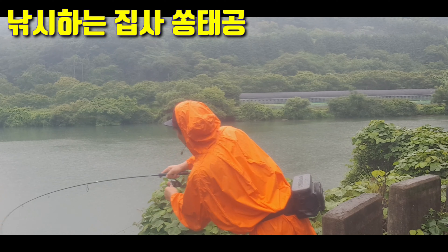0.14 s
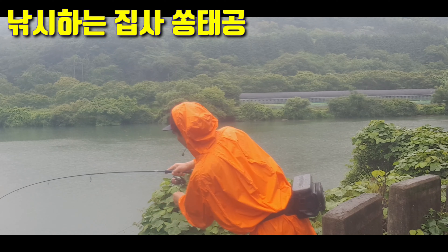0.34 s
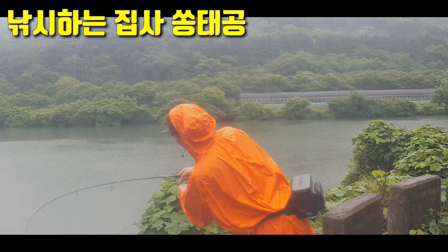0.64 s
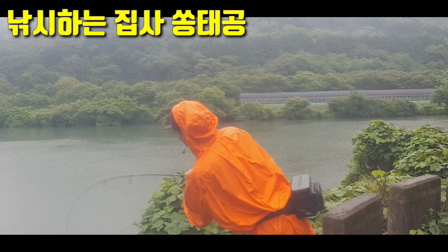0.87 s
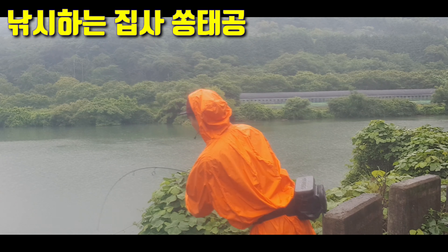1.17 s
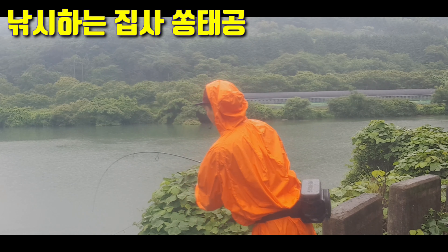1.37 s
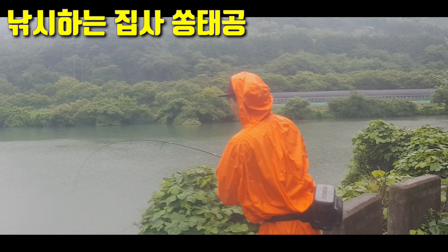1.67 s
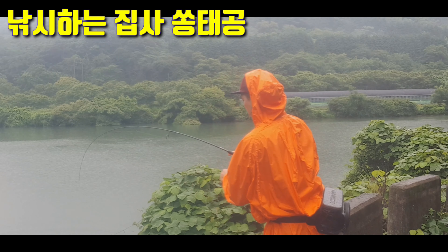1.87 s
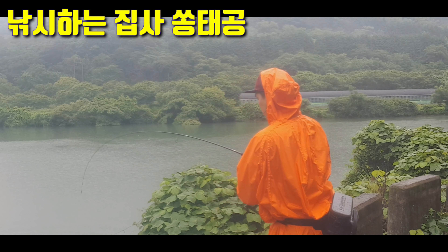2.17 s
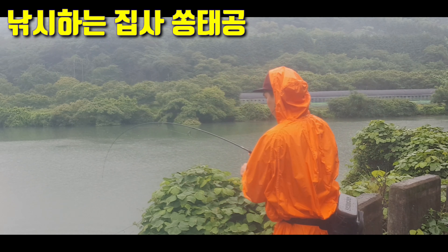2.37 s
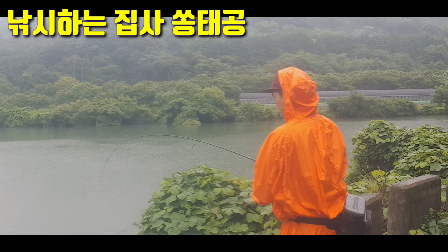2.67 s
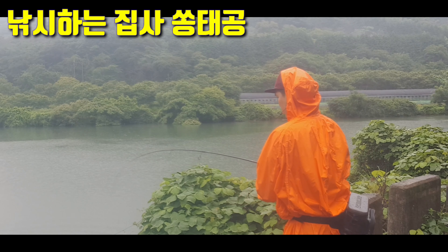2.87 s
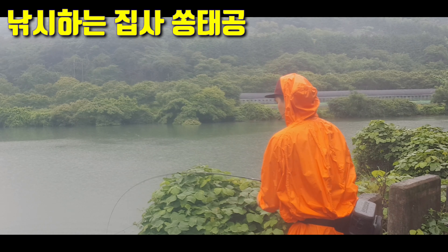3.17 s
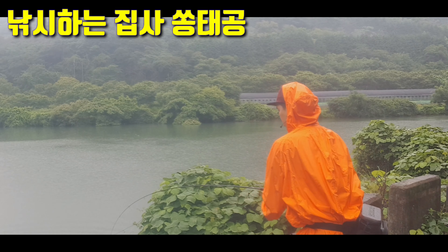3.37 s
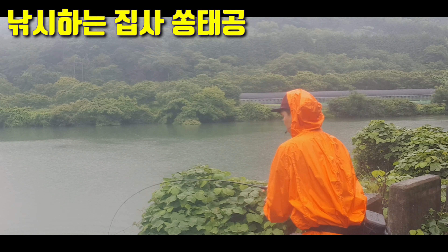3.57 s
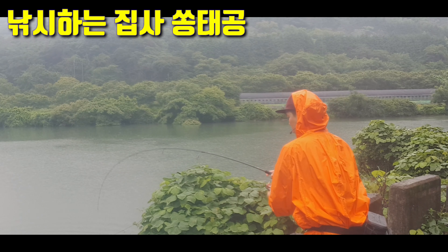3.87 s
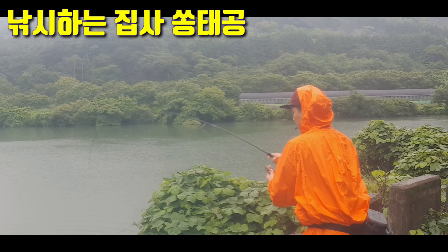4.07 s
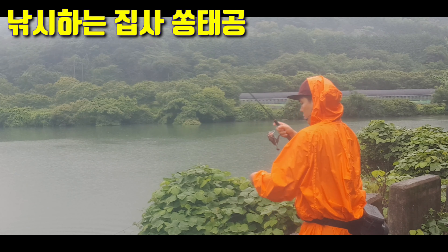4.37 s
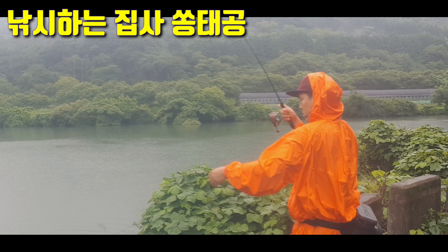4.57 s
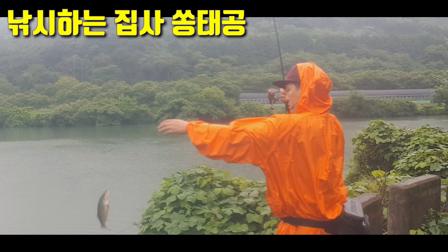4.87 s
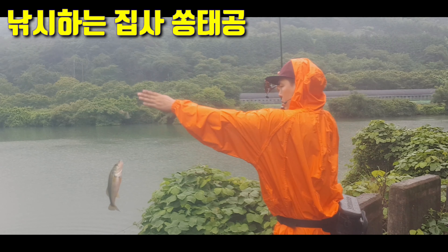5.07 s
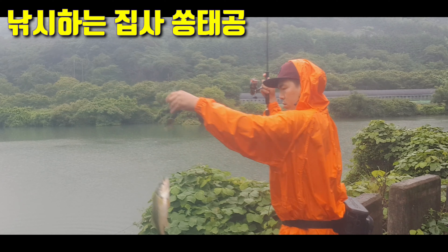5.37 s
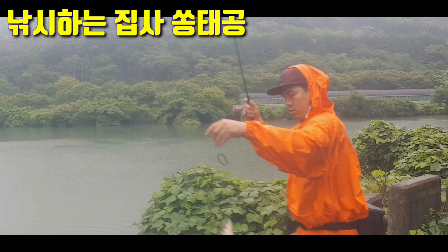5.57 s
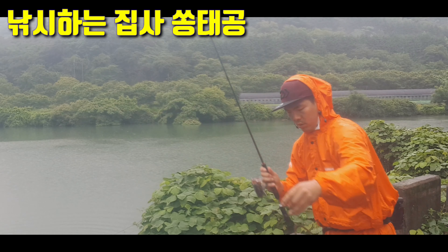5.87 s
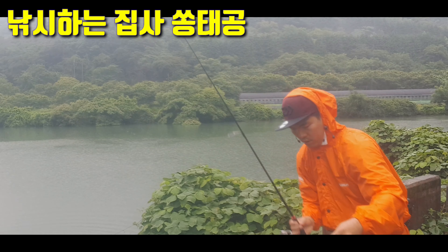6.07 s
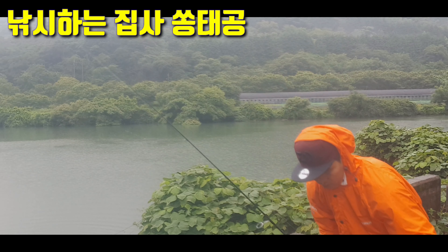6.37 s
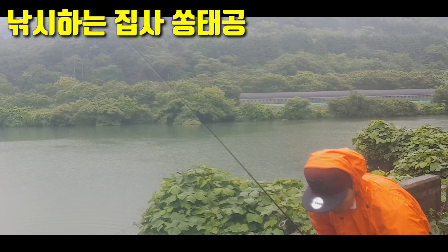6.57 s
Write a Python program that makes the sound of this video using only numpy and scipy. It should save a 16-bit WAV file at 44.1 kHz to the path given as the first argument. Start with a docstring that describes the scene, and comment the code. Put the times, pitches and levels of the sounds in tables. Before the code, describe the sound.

A wet, close microphone hears even rain on water and leaves. From the start a reel ratchets in bright, ringing clicks, accelerating and slowing in four runs until nearly four seconds, then only lone ticks. Big drops strike the housing unpredictably, loudest near one second, clustered around three, and again near the end. Light leaf pats, soft drips and very faint line squeaks fill in.

```python
"""Lake shore in steady rain, heard at a wet camera: left port loud and dull, right port faint and thin.
Rain is octave bands of noise and random impulses, each flickering alone. Single hits slap and thump the
housing (swelling sines, noise spray, decaying modes). An angler plays a fish: the reel's drag clicks in
runs for about four seconds (noise bursts ringing the spool), with lone ticks, a few of them last.
The wet line squeaks faintly (gliding sines)."""
import sys
import numpy as np
from scipy import signal
from scipy.fft import rfft, irfft
from scipy.io import wavfile
from scipy.ndimage import uniform_filter1d

SR = 44100
rng = np.random.default_rng(int(sys.argv[2]) if len(sys.argv) > 2 else 0)


def transcribe(u):
    """Save the signal u as a 16-bit wav file named by the first command-line argument.

    u: samples, shape (n,) or (channels, n), limited to [-1, 1]; the rate is SR.
    q: integer samples, one column per channel.
    """
    v = np.clip(np.atleast_2d(u).T, -1, 1)
    q = np.round(v * 32767).astype(np.int16)
    wavfile.write(sys.argv[1], SR, q)


N = 296352
T = np.arange(N) / SR  # s

# rain colour at each port: f/Hz, relative gain/dB
RAIN_LEFT_COLOUR = [(25, -23), (65, -14), (110, -16), (155, -9.5), (220, -13.5), (400, -6.5), (780, -1.5),
                    (1100, -5), (1800, 1.5), (2400, -2), (3300, -10), (5000, -21), (8000, -55),
                    (11500, -30.5), (15500, -25)]
RAIN_RIGHT_COLOUR = [(25, -23), (65, -1), (170, -2.5), (400, -1), (580, 4), (850, 1), (1400, -0.5),
                     (1750, -3), (2300, -1), (4400, 1), (8100, -12.5), (11200, 1.5), (13500, -7),
                     (15500, -5.5)]
# strength of the shower: t/s, relative level/dB
SHOWER_STRENGTH = [(0, 1), (1.5, -0.24), (5, 0), (6.72, 1.16)]
RAIN_LEFT_DB, RAIN_RIGHT_DB = -46, -56

# nearest drops on leaves: t/s, relative peak/dB, f/Hz
LEAF_PATS = [(0.3508, -36, 2160), (4.282, -35, 2340), (5.0601, -36, 2290), (5.2367, -36, 2000),
             (5.247, -38, 2100), (5.623, -35.5, 2920)]
# soft drips on the mount, one pitch: t/s, relative peak/dB
MOUNT_DRIPS = [(.289, -57), (.707, -51), (2.488, -60), (5.104, -54), (5.248, -55), (5.301, -53),
               (5.816, -54.5), (5.94, -51), (6.091, -53.5), (6.457, -51.5)]
DRIP_HZ = 318

# hits on the housing, levels before filtering and port gains;
# the four rows from 2.936 s are one thump with its bounces:
# t/s, slap f/Hz, swell/cycles, slap level/dB, shell level/dB, body level/dB
HOUSING_HITS = [(0.441, 563, 0.39, -13, -28.5, -23), (0.8635, 2440, 0.94, -0.5, -18.5, -38),
                (1.0156, 1976, 0.88, -1.5, -1.5, -13.5), (2.802, 2280, 0.85, -6, -15, -38),
                (2.936, 592, 0.61, -15, -33, -19.5), (2.942, 273, 0.83, -23, -54, -46),
                (2.9555, 210, 0.47, -26.5, -55, -41), (2.975, 181, 0.73, -32.5, -60, -45),
                (3.1603, 1650, 0.56, -5, -28, -23.5), (3.166, 3100, 1.9, -19, -22.5, -52),
                (3.6809, 1990, 0.78, -12.5, -12.5, -37.5), (6.1828, 2380, 1.03, -1, -28, -35.5),
                (6.5529, 2520, 1.25, -11, -12.5, -44)]
# short ring of the shell: f/Hz, t60/s, relative level/dB
SHELL_MODES = [(1010, .014, -4.5), (1310, .02, -17), (1830, .012, -6.5), (2430, .01, 0), (3300, .008, -10)]
# deeper modes of body and mount: f/Hz, t60/s, relative level/dB
BODY_MODES = [(152.4, .22, -21), (191, 0.16, -18.5), (250, 0.05, -16), (317, 0.053, -10.5),
              (603, 0.015, 3.5), (850, 0.022, -0.5)]
# uneven treble of slaps, spray and shell: f/Hz, gain/dB
PORT_TREBLE = [(3300, -1), (4600, 1.5), (6000, -1), (8300, -17.5), (11000, -6)]
# spray falls off faster than the slap; slaps below HARD_HZ throw much less
SPRAY_DB, SPRAY_DB_PER_SLAP_DB, SPRAY_DB_PER_OCTAVE, HARD_HZ = -16.5, 2.4, 75, 2260

# wet line in the rod guides: t/s, length/s, start f/Hz, end f/Hz, left level/dB, right level/dB
LINE_SQUEAKS = [(0.18, 0.06, 10000, 10200, -88, -48.5), (.745, 0.1, 10000, 10400, -74, -52.5),
                (3.828, 0.084, 4450, 4700, -61, -69)]

# runs of the fish: t/s, length/s, speeding up/s, slowing down/s, top rate/(clicks/s), relative level/dB
FISH_RUNS = [(-.02, .49, .22, 0.11, 125, -53), (0.758, 0.28, .08, 0.18, 110, -53.5),
             (1.06, 1.85, .2, .37, 205, -57.5), (3.059, 0.76, .2, .24, 110, -58.5)]
CRAWL_CLICKS_PER_S = 29  # at the ends of a run
# louder at speed, and as the line tightens through a run
DRAG_DB_PER_DOUBLING, TIGHTEN_DB_PER_S = 4, 3
# lone clicks of the drag: t/s, relative peak/dB
LONE_TICKS = [(0.5048, -48), (3.837, -50), (4.0153, -58), (4.2053, -51), (4.31, -45), (4.595, -45),
              (4.786, -49.5)]
# thin snap of the pawl: f/Hz, relative gain/dB
PAWL_COLOUR = [(3000, -42), (9000, -34), (9950, -20), (10170, -7), (10500, -13), (11300, -9), (12700, -20),
               (13550, -15), (13900, -4), (14300, -5), (15500, 0), (15900, -40)]
# close pair of spool modes: f/Hz, t60/s, relative level/dB
SPOOL_MODES = [(4217, 0.085, 2.5), (4360, 0.038, -2.5)]
SNAP_DB, SPOOL_DB, TICK_DB = 1.8, 1.3, 5.5  # relative to drag rms; TICK_DB is added to the tick table
SCATTER_DB, UNEVEN_DB = 1.5, 1.3  # rms scatter of snap size, of tooth rate
SNAP_S = .0011  # decay constant of snap power
# a tight line weakens the spool's ring; it also wavers as the spool turns
TIGHT_DAMPING_DB_PER_S, WAVER_DB, WAVER_PER_S = 2.0, 2.0, 25

TOP_HZ = 15600


def undb(db):
    """Amplitude ratio of a level in dB."""
    return 10 ** (np.asarray(db) / 20)


def unit(x):
    """Scale to rms 1."""
    return x / np.sqrt(np.mean(x ** 2))


def curve(rows):
    """Join (t/s, value) rows by straight lines."""
    return np.interp(T, *np.transpose(rows))


def add(out, start_s, sound):
    """Mix a short sound in at start_s."""
    i = max(int(start_s * SR), 0)
    part = out[..., i:i + sound.shape[-1]]
    part += sound[..., :part.shape[-1]]


def bin_hz():
    """FFT bin frequencies, at least 1 Hz."""
    return np.maximum(np.arange(N // 2 + 1) * SR / N, 1)


def colour(x, points):
    """Filter by (f/Hz, gain/dB) points, joined on log frequency."""
    hz, db = np.transpose(points)
    gain_db = np.interp(np.log(bin_hz()), np.log(hz), db)
    return irfft(rfft(x) * undb(gain_db), N)


def low_cut(x, hz):
    """High-pass: a small housing gives off little deep bass."""
    return signal.sosfilt(signal.butter(3, hz, "high", fs=SR, output="sos"), x)


def walk(rate_hz):
    """Random levels held 1 / rate_hz, smoothed twice over that time; rms 1."""
    hold = max(int(SR / rate_hz), 1)
    steps = np.repeat(rng.standard_normal(N // hold + 1), hold)
    smooth = uniform_filter1d(uniform_filter1d(steps, hold), hold)
    return unit(smooth[:N])


def ring(modes, size=12000):
    """Free decay of modes after a blow, neighbours opposite in polarity; peak 1."""
    t = T[:size]
    wave = np.zeros(size)
    for k, (hz, t60_s, db) in enumerate(modes):
        wave += (-1) ** k * undb(db - 60 * t / t60_s) * np.sin(2 * np.pi * hz * t)
    return wave / abs(wave).max()


def slap(hz, cycles, size=1500):
    """Slap of a hit: a sine whose envelope swells to 1 over the given cycles, then decays."""
    age = T[:size] * hz / cycles
    envelope = age ** 2 * np.exp(2 * (1 - age))
    return envelope * np.sin(2 * np.pi * cycles * (age - 1))


def scatter_tail(x, db, t60_s):
    """Scattered reflections after a hit: a short, ragged noise tail from 1 ms on."""
    t = T[:SR // 5]
    tail = rng.standard_normal(len(t)) * undb(-60 * t / t60_s) * (t > .001)
    return x + undb(db) * signal.fftconvolve(x, tail / np.linalg.norm(tail))[:N]


def patter(spread_db, count=20000):
    """Drops as impulses at random times and signs, a few near and most far; rms 1."""
    when, far, sign = rng.random((count, 3)).T
    size = undb(spread_db * np.minimum(-np.log(1 - far), 6))
    return unit(np.bincount((when * N).astype(int), size * np.sign(sign - .5), N))


def rain(spectrum, db, near_db, flicker_db):
    """Hiss from the lake and patter from the leaves; each octave has its own drops and flickers alone."""
    out = 0
    octaves = np.log2(bin_hz() / 31.25)
    for k in range(10):
        drops = rng.standard_normal(N) + undb(near_db) * patter(spread_db=3.0)
        band = np.cos(np.pi / 2 * np.clip(octaves - k, -1, 1))
        out = out + irfft(rfft(drops) * band, N) * undb(flicker_db * walk(22.04))
    return unit(colour(out, spectrum)) * undb(db + curve(SHOWER_STRENGTH))


def near_drops(pat_db=5.5, drip_db=0, drip_body_db=-1, right_db=-14):
    """Light pats on leaves, and soft drips that stir the body modes of the camera."""
    pats, drips = np.zeros(N), np.zeros(N)
    for s, db, hz in LEAF_PATS:
        add(pats, s, undb(db + pat_db) * slap(hz, cycles=1.17))
    for s, db in MOUNT_DRIPS:
        add(drips, s, undb(db + drip_db) * slap(DRIP_HZ, cycles=1.0))
        add(drips, s, undb(db + drip_body_db) * ring(BODY_MODES))
    out = pats + scatter_tail(drips, db=11.5, t60_s=0.12)
    return low_cut(np.array([out, undb(right_db) * out]), hz=100)


def housing(right_slap_db=-42, right_thump_db=-19, spray_s=0.0007):
    """Hits by the left port: slap with fine spray, short shell ring, longer body thump."""
    sharp, dull = np.zeros(N), np.zeros(N)
    t = T[:N // 200]
    for s, hz, cycles, slap_db, shell_db, body_db in HOUSING_HITS:
        octaves_below = min(np.log2(hz / HARD_HZ), 0)
        spray_db = SPRAY_DB + SPRAY_DB_PER_SLAP_DB * slap_db + SPRAY_DB_PER_OCTAVE * octaves_below
        spray = rng.standard_normal(len(t)) * np.exp(-t / spray_s)
        add(sharp, s, undb(slap_db) * slap(hz, cycles))
        add(sharp, s, undb(spray_db) * spray)
        add(sharp, s, undb(shell_db) * ring(SHELL_MODES))
        add(dull, s, undb(body_db) * ring(BODY_MODES))
    sharp = scatter_tail(colour(sharp, PORT_TREBLE), db=-21, t60_s=0.038)
    dull = scatter_tail(dull, db=-14.5, t60_s=0.043)
    left = sharp + dull
    right = undb(right_slap_db) * sharp + undb(right_thump_db) * dull
    return low_cut(np.array([left, right]), hz=97.5)


def fishing_line():
    """Wet line in the guides: faint gliding sines that swell and fade."""
    out = np.zeros((2, N))
    for s, length_s, start_hz, end_hz, left_db, right_db in LINE_SQUEAKS:
        hz = np.linspace(start_hz, end_hz, int(length_s * SR))
        tone = np.hanning(len(hz)) * np.sin(2 * np.pi * np.cumsum(hz) / SR)
        add(out, s, undb([[left_db], [right_db]]) * tone)
    return out


def spool_motion():
    """Each run speeds up from a crawl, holds and slows; gives clicks/s, drag amplitude, time into run/s."""
    rate, drag, run_age = np.full(N, float(CRAWL_CLICKS_PER_S)), np.zeros(N), np.zeros(N)
    for start_s, length_s, rise_s, fall_s, top_rate, db in FISH_RUNS:
        age = T - start_s
        running = (age >= 0) & (age < length_s)
        pull = np.clip(np.minimum(age / rise_s, (length_s - age) / fall_s), 0, 1)
        run_rate = CRAWL_CLICKS_PER_S * (top_rate / CRAWL_CLICKS_PER_S) ** pull
        rate = np.where(running, run_rate, rate)
        speed_db = DRAG_DB_PER_DOUBLING * np.log2(rate / top_rate)
        drag = drag + running * undb(db + speed_db + TIGHTEN_DB_PER_S * age)
        run_age = run_age + running * age
    return rate, drag, run_age


def reel(scrape_db=-6, snap_left_db=-14, spool_right_db=-6.0, spool_right_radians=2.13, flutter_db=2):
    """A pawl snaps over the teeth of the turning spool and scrapes between them; snaps ring the spool."""
    rate, drag, run_age = spool_motion()
    tooth_rate = rate * undb(UNEVEN_DB * walk(150))
    teeth = np.diff(np.floor(np.cumsum(tooth_rate) / SR), prepend=0)
    # sqrt(SR / rate) offsets the closer spacing of snaps at speed
    snaps = drag * teeth * np.sqrt(SR / rate) * undb(SCATTER_DB * rng.standard_normal(N))
    keep = np.exp(-1 / (SNAP_S * SR))
    for s, db in LONE_TICKS:
        snaps[int(s * SR)] += undb(db + TICK_DB) / np.sqrt(2 * (1 - keep))

    # each snap is a decaying burst of noise
    snap_power = signal.lfilter([1 - keep], [1, -keep], snaps ** 2)
    power = snap_power + (undb(scrape_db) * drag) ** 2
    chatter = colour(np.sqrt(power) * rng.standard_normal((2, N)), PAWL_COLOUR)
    pawl = unit(chatter) * undb(SNAP_DB + np.array([[snap_left_db], [0]]))

    # the ring flutters as the spool turns, and reaches the ports out of phase
    kicks = snaps * undb(WAVER_DB * walk(WAVER_PER_S) - TIGHT_DAMPING_DB_PER_S * run_age)
    ringing = signal.fftconvolve(kicks, ring(SPOOL_MODES))[:N]
    tone = signal.hilbert(unit(ringing * undb(flutter_db * walk(45.6))))
    right_tone = tone * undb(spool_right_db) * np.exp(-1j * spool_right_radians)
    spool = undb(SPOOL_DB) * np.real([tone, right_tone])
    return np.sqrt(np.mean(drag ** 2)) * (pawl + spool)


def scene():
    """Sum of rain at both ports, near drops, housing hits, line and reel."""
    left = rain(RAIN_LEFT_COLOUR, RAIN_LEFT_DB, near_db=0.5, flicker_db=0.64)
    right = rain(RAIN_RIGHT_COLOUR, RAIN_RIGHT_DB, near_db=-1.0, flicker_db=2.0)
    return np.array([left, right]) + near_drops() + housing() + fishing_line() + reel()


def record(dry):
    """Steep elliptic low-pass at TOP_HZ: the recorder cuts the top."""
    return signal.sosfilt(signal.ellip(10, .2, 70, TOP_HZ, fs=SR, output="sos"), dry)


dry = scene()
out = record(dry)
transcribe(out)
```